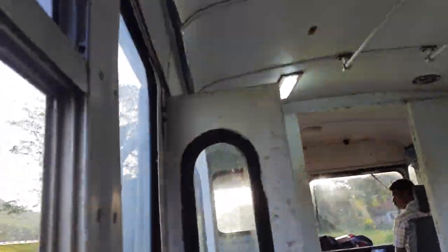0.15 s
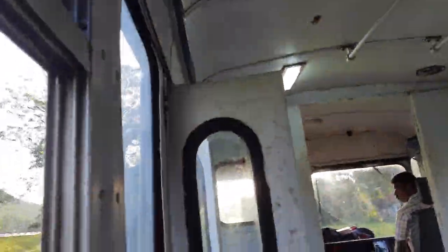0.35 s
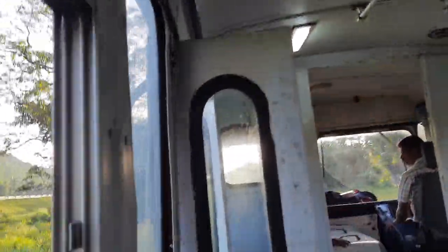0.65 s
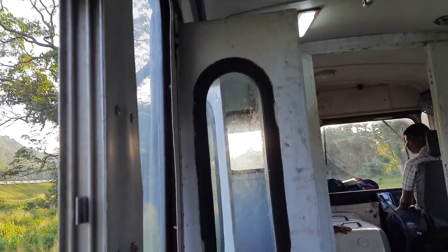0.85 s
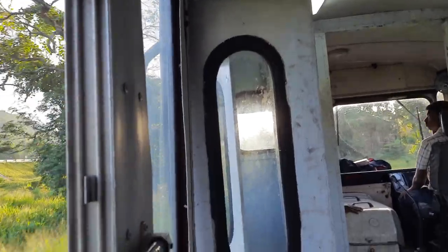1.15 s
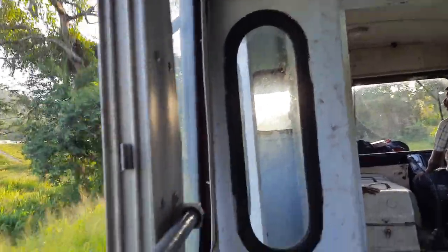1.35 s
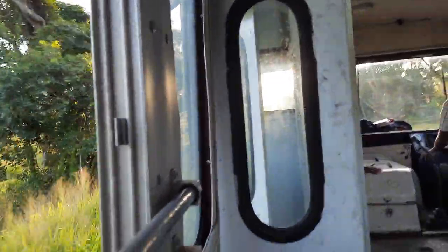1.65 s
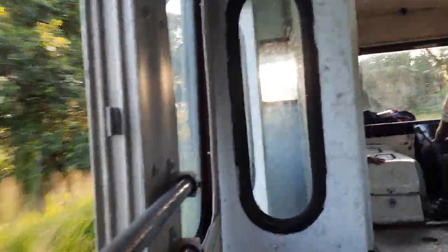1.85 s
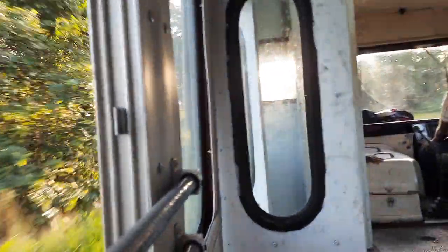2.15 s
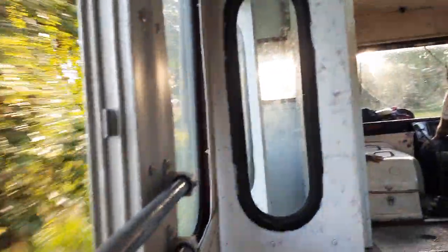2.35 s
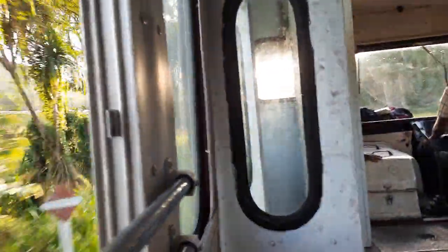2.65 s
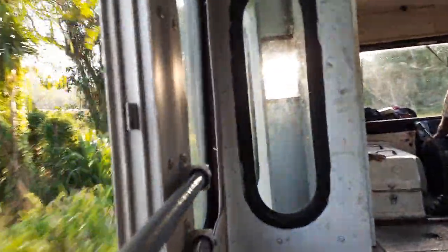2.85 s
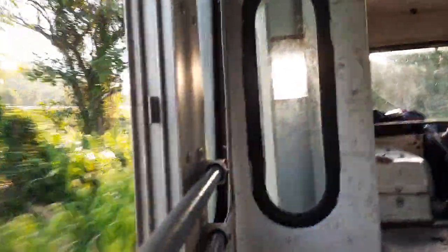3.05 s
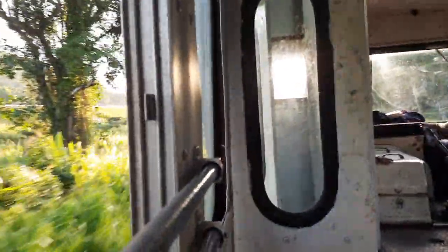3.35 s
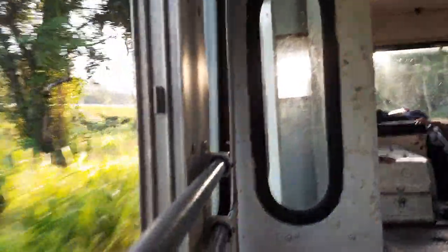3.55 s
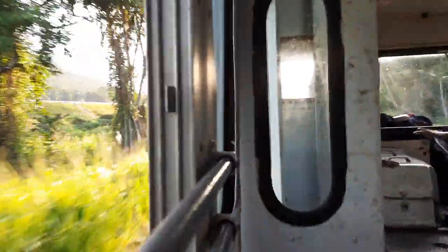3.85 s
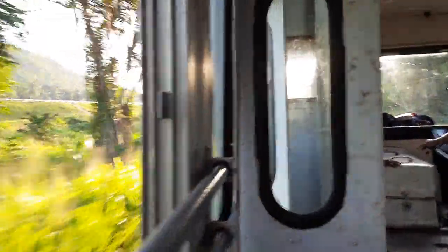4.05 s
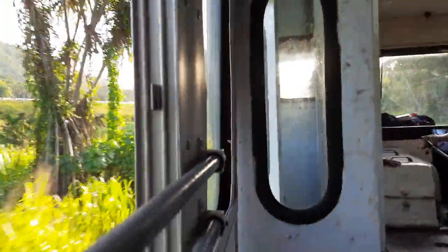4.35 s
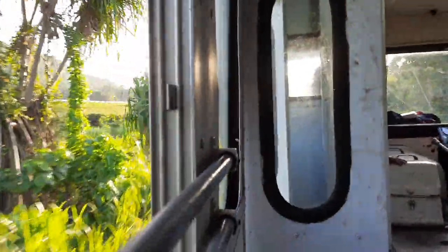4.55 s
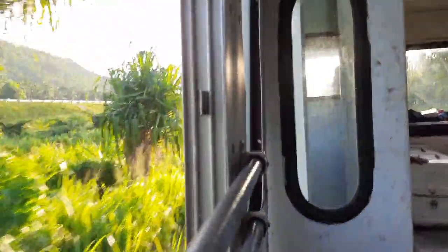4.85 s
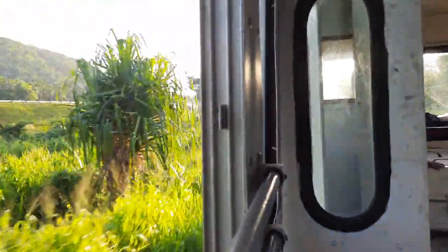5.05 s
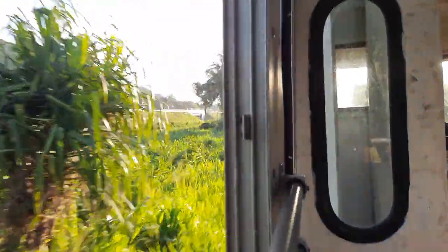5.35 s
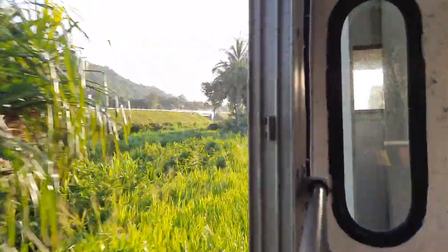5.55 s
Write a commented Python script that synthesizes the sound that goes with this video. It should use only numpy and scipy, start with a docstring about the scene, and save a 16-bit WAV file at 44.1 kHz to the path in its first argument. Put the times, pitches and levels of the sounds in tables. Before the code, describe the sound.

Low drumming of a moving rail carriage with soft rushing air, and ragged wind gusts crackling mainly against the left side of the microphone.

```python
"""The deep boom and rumble of a rail bus in open country, heard by a two-port microphone at its open door.
The body is filtered noise that surges over uneven track; air past the doorway is swelling, flickering noise.
Gusts are short bursts of fluttering noise, mostly on the left port, and pressure pops crackle, most within
gusts and some alone; the left port's bass drops out for a moment at set times."""
import sys
import numpy as np
from scipy import signal
from scipy.fft import rfft, irfft, next_fast_len
from scipy.io import wavfile
from scipy.ndimage import uniform_filter1d

SR = 44100
rng = np.random.default_rng(int(sys.argv[2]) if len(sys.argv) > 2 else 0)


def put_to_file(sound):
    """Save the sound as 16-bit audio at rate SR, in the file named by the first command-line argument."""
    columns = np.atleast_2d(sound).T  # one column per channel
    safe = np.clip(columns, -1, 1)
    whole_steps = np.round(safe * 32767)
    wavfile.write(sys.argv[1], SR, whole_steps.astype(np.int16))


N = 251354
T = np.arange(N) / SR
COARSE = T[::16]  # slow controls need fewer points in time
FAST = next_fast_len(N)  # a length that transforms quickly

# The drumming body between surges.
# Each row: time in seconds, level in dB, lift of the deepest boom in dB (surges included).
BODY_BED = [(0, -14.5, -3.5), (.4, -17.5, -2), (.8, -19, -4), (1.4, -23.5, 5), (2, -17, -3.5),
            (2.9, -22, 0.5), (3.6, -18, -0.5), (4.25, -23.5, 3), (4.9, -19.5, 4), (5.7, -23.5, 5)]


def gain_of(db):
    """Turns decibels into a factor."""
    return 10 ** (np.asarray(db) / 20)


def evened(x):
    """Scales x to an rms (average strength) of 1."""
    return x / np.sqrt(np.mean(x ** 2) + 1e-20)


def read(points, hz):
    """Reads a table over frequency, joining its points on a log axis."""
    f, value = np.transpose(points)
    return np.interp(np.log(hz + 1), np.log(f + 1), value)


def curve(rows):
    """Draws each column of a table over time out to every sample."""
    s, *columns = np.transpose(rows)
    return [np.interp(T, s, c) for c in columns]


def fine(rows):
    """Draws coarse controls out to every sample."""
    return np.array([np.interp(T, COARSE, row) for row in rows])


def coloured(x, spectrum, band, sudden=False):
    """Filters x so that white noise of rms 1 has rms 1 inside the band (Hz); sudden keeps attacks sharp."""
    hz = np.fft.rfftfreq(FAST, 1 / SR)
    gain = gain_of(read(spectrum, hz))
    inside = (hz > band[0]) & (hz < band[1])
    gain = gain / np.sqrt(np.mean(inside * gain ** 2))
    if sudden:  # minimum phase: nothing sounds before the blow
        echo = irfft(np.log(gain), FAST)
        gain = np.exp(rfft(echo * (1 + np.sign(np.fft.fftfreq(FAST)))))
    return irfft(rfft(x, FAST) * gain, FAST)[..., :N]


def bass_of(x, edge_hz):
    """Keeps the part of x below the edge, with a smooth slope."""
    hz = np.fft.rfftfreq(FAST, 1 / SR)
    return irfft(rfft(x, FAST) / (1 + (hz / edge_hz) ** 6), FAST)[..., :N]


def flicker(ms, channels):
    """Makes smooth chance movement of rms 1 that changes within about ms milliseconds."""
    size = max(round(ms * SR / 1000), 1)
    smooth = uniform_filter1d(rng.standard_normal((channels, N)), size)
    return evened(uniform_filter1d(smooth, size))


def patchy(x, patch_db, size=512):
    """Lifts and lowers small patches of time and pitch by chance, alike on both ports."""
    overlap = size * 3 // 4
    z = signal.stft(x, nperseg=size, noverlap=overlap)[2]
    field = rng.standard_normal(z.shape[1:])
    for _ in range(2):
        field = uniform_filter1d(field, size=3, axis=0)
        field = uniform_filter1d(field, size=5, axis=1)
    patches = evened(gain_of(patch_db * evened(field)))
    return signal.istft(z * patches, nperseg=size, noverlap=overlap)[1][:, :N]


def body_levels():
    """Gives boom and rumble gains: a lumpy bed, with surges over uneven track that swell and fall away."""
    # Each row: start in seconds, length in seconds, boom level in dB, upper rumble against the boom in dB.
    # The soft edges keep very short surges below their level.
    surge_rows = [(0.002, 0.46, -18, -6), (0.391, 0.023, -31, -10), (0.426, 0.16, -13, -15),
                  (0.667, 0.049, -12, -4), (0.72, 0.072, -14.5, -5), (0.804, 0.071, -21.5, 3.5),
                  (0.886, 0.08, -27, 9), (0.981, 0.037, -19, 3.5), (1.02, 0.067, -20.5, -3.5),
                  (1.136, 0.022, -11, -6.5), (1.182, 0.043, -23, 4.5), (1.245, 0.086, -17.5, -5.5),
                  (1.337, 0.093, -20.5, 2), (1.466, 0.2, -19.5, 0), (1.792, 0.027, -6.5, -17),
                  (1.897, 0.028, -14.5, -5.5), (1.96, 0.093, -11, -8.5), (2.139, 0.033, -18.5, 7),
                  (2.197, 0.2, -15.5, -10.5), (2.586, 0.06, -14, -9.5), (2.73, 0.081, -14.5, -5.5),
                  (2.856, 0.027, -16.5, -3.5), (3.13, 0.021, -19, -25), (3.475, 0.044, -16, -7),
                  (3.54, 0.05, -19, -8), (3.687, 0.015, -9, -27), (3.848, 0.097, -12.5, -2.5),
                  (4.191, 0.11, -16.5, -3.5), (4.367, 0.058, -16.5, -0.5), (4.485, 0.03, -14.5, -1.5),
                  (4.755, 0.068, -11, -6.5), (5.094, 0.013, -11.5, -7.5), (5.133, 0.027, -13.5, -4.5),
                  (5.247, 0.031, -12.5, -3.5), (5.327, 0.022, -9.5, -8.5), (5.478, 0.021, -9.5, -9),
                  (5.539, 0.025, -13.5, -18), (5.627, 0.054, -20.5, 3.5)]
    edge_s, bed_rumble_db, lumps_db = 0.017, -4, 2
    bed_db = curve(BODY_BED)[0] + lumps_db * flicker(31, channels=2)
    surges = 0
    for s, length, db, rumble_db in surge_rows:
        before = s + edge_s - COARSE
        after = COARSE - s - length + edge_s
        away = np.maximum(np.maximum(before, after), 0)
        power = gain_of([[db], [db + rumble_db]]) ** 2
        surges = surges + power * np.exp(-(away / edge_s) ** 2)
    bed = gain_of(bed_db + [[0], [bed_rumble_db]])
    return np.sqrt(bed ** 2 + fine(surges))


def body():
    """Panels boom and rumble in swells; the ports are most alike from about 60 to 290 Hz."""
    # Tone of the deep boom. Each row: frequency in Hz, strength in dB per Hz.
    boom = [(15, -38), (35, -2), (55, 0.5), (68, 1.5), (88, 11.5), (104, 10.5), (120, 11.5), (135, 8.5),
            (148, 13), (185, 1), (230, -34), (400, -110)]
    # Tone of the upper rumble. Each row: frequency in Hz, strength in dB per Hz.
    rumble = [(60, -89), (120, -21.5), (175, -2.5), (210, 1.5), (248, 1.5), (330, -8), (450, -15.5),
              (700, -23.5), (1100, -37.5), (3000, -100)]
    # How alike the ports are, less so in the deepest bass.
    # Each row: frequency in Hz, left-right likeness from 0 to 1.
    likeness = [(25, 0.32), (60, 0.92), (130, 0.92), (290, 0.82), (640, 0.51), (1200, 0.71), (3000, 0.08)]
    # Loudness balance of the ports. Each row: frequency in Hz, left over right in dB.
    left_lean = [(100, 0.1), (200, 1), (330, 3), (600, 1.5)]
    deep_hz = 113
    hz = np.fft.rfftfreq(FAST, 1 / SR)
    same = np.clip(read(likeness, hz), 0, 1)
    lean = gain_of(read(left_lean, hz) * [[.5], [-.5]])
    out = np.zeros((2, N))
    layers = zip(body_levels(), (boom, rumble), ((60, 170), (170, 400)), (70, 50))
    for level, spectrum, band, steady_ms in layers:
        shared, *own = rfft(rng.standard_normal((3, FAST)))
        mixed = np.sqrt(same) * shared + np.sqrt(1 - same) * np.array(own)
        pair = coloured(irfft(lean * mixed, FAST), spectrum, band)
        size = round(steady_ms * SR / 2000)
        power = uniform_filter1d(uniform_filter1d((pair ** 2).mean(0), size), size)
        steadied = evened(pair / (abs(power) + 0.074) ** 0.047)  # slightly evens the noise's slower swells
        out += steadied * uniform_filter1d(level, size=300)
    return out + (gain_of(curve(BODY_BED)[1]) - 1) * bass_of(out, deep_hz)


def air(gust):
    """Separate noise at each port under a common swell that gusts lift, with shared flicker and own eddies."""
    # Each row: time in seconds, rush level in dB, fine hiss against the rush in dB.
    air_rows = [(0, -41, -20), (.08, -41.5, -11), (.16, -39.5, -12.5), (.41, -42.5, -19), (.47, -39.5, -11),
                (.57, -39.5, -13), (.63, -45.5, -19), (.82, -41.5, -16), (1.03, -43.5, -16),
                (1.08, -40.5, -13), (1.34, -40, -15), (1.44, -42.5, -16), (1.56, -42, -13),
                (1.84, -48, -19), (1.95, -42, -20), (2.12, -47, -16), (2.22, -40, -18), (2.36, -47, -19),
                (2.47, -43.5, -13), (2.6, -48.5, -24), (2.75, -49.5, -17), (2.79, -45.5, -18),
                (2.95, -47.5, -13), (3.28, -49.5, -24), (3.33, -45, -16), (3.43, -50, -18),
                (3.52, -43.5, -14), (3.72, -45.5, -17), (3.78, -44.5, -18), (3.85, -41, -18),
                (3.94, -40.5, -17), (4.01, -48, -15), (4.27, -45.5, -19), (4.33, -45.5, -14),
                (4.44, -37.5, -17), (4.52, -43, -16), (4.73, -45, -14), (4.8, -41.5, -15.5),
                (5.08, -46.5, -18), (5.15, -43.5, -13), (5.22, -48, -11), (5.28, -43.5, -15),
                (5.56, -42.5, -21), (5.62, -50.5, -20), (5.7, -41.5, -25)]
    # Tone of the rush. Each row: frequency in Hz, strength in dB per Hz.
    rush = [(100, -65), (250, 5), (500, 15.5), (1000, 12.5), (1800, 5.5), (2600, 4), (4500, 0.5),
            (6650, -4), (8200, -6.5), (9300, -28), (11000, -64), (14000, -72)]
    # Tone of the fine hiss. Each row: frequency in Hz, strength in dB per Hz.
    fine_hiss = [(4000, -70), (7000, -25), (9300, -3), (10500, -3), (12500, 0), (14000, -3), (15800, -4)]
    stir_db, stir_ms = .25, 70.
    gust_rush_db, steady_hiss_db = -33, -66  # rush added by gusts; hiss that never stops
    rush_db, hiss_db = curve(air_rows)
    passing = gain_of(rush_db + stir_db * flicker(stir_ms, channels=1))
    swell = np.hypot(passing, gain_of(gust_rush_db) * gust)
    hiss = np.hypot(swell * gain_of(hiss_db), gain_of(steady_hiss_db))
    shared_db = 0.79 * flicker(19, channels=1)
    eddies_db = 0.27 * flicker(4.1, channels=2)
    stir = evened(gain_of(shared_db + eddies_db))
    noise = stir * rng.standard_normal((2, N))
    return coloured(noise * swell, rush, (2500, 8000)) + coloured(noise * hiss, fine_hiss, (10000, 15500))


def gust_level():
    """Gains of flutter and thud at each port: gusts rise a little faster than they fall, over a breeze."""
    # Each row: peak time in seconds, port (0 left, 1 right), fall to a quarter of its height in ms,
    # flutter level in dB, lift of its low thud in dB.
    gust_rows = [(0.464, 0, 9.2, -28.5, -8), (0.517, 0, 27, -31.5, 1), (0.518, 1, 35, -35, 8.5),
                 (0.576, 0, 20, -29, -4), (0.617, 0, 13, -26, -3), (0.643, 0, 16, -24, -1),
                 (0.668, 0, 27, -26, 2), (0.697, 1, 19, -29, 1), (0.697, 0, 37, -24.5, 3),
                 (1.006, 0, 14, -31, 4), (1.081, 0, 12, -31, -4), (1.114, 0, 9.8, -34.5, 14),
                 (1.153, 0, 57, -33, -9), (1.338, 0, 53, -31.5, -4), (1.625, 0, 140, -33.5, -5),
                 (1.71, 0, 26, -36, 2), (2.17, 0, 23, -26.5, -3.5), (2.204, 0, 21, -25, -4),
                 (2.279, 0, 23, -31.5, -8), (2.33, 0, 27, -34, -11), (2.372, 0, 40, -31, 0),
                 (2.435, 0, 8.5, -36, 0), (2.494, 0, 8.7, -40, 10), (2.536, 0, 8.1, -42, 13),
                 (3.383, 0, 77, -38.5, -6), (3.661, 0, 5.5, -30, 0), (3.709, 0, 27, -30, 0.5),
                 (3.75, 0, 60, -37, -5), (3.813, 0, 5.9, -31, 7), (3.859, 0, 60, -27, -13),
                 (3.939, 0, 71, -33.5, -0.5), (4.072, 0, 55, -32.5, -6), (4.104, 0, 19, -31, 0),
                 (4.279, 0, 71, -31.5, -6), (4.401, 0, 38, -39, -7), (4.645, 0, 20, -32.5, 2.5),
                 (4.687, 0, 10, -28.5, -2), (4.799, 0, 41, -31, 3.5), (4.911, 0, 28, -28.5, -4),
                 (4.98, 0, 17, -25.5, 3), (5.011, 0, 32, -30, 5), (5.052, 0, 8.1, -30, -13),
                 (5.176, 0, 12, -31.5, 4), (5.363, 0, 29, -32, 5), (5.396, 0, 6.4, -29.5, 1),
                 (5.516, 0, 17, -23.5, -4.5), (5.562, 0, 50, -26, -6), (5.637, 1, 28, -33.5, 1)]
    other_port_db = -6.5  # what a gust leaves on the far port
    rise = 0.9  # a gust rises in this share of the time it takes to fall
    breeze_db, swing_db = -47.5, 5  # small gusts left to chance
    power = low = 0
    for s, port, ms, db, thud_db in gust_rows:
        share = gain_of(other_port_db * abs(np.array([[0], [1]]) - round(port)))
        width_s = ms / 1000 * np.where(COARSE < s, rise, 1)
        blow = (gain_of(db) * share) ** 2 * np.exp(-np.log(16) * ((COARSE - s) / width_s) ** 2)
        power = power + blow
        low = low + blow * gain_of(thud_db) ** 2
    breeze = gain_of(breeze_db + swing_db * flicker(42, channels=2)) ** 2
    return np.sqrt(fine(power) + breeze), np.sqrt(fine(low) + breeze)


def gusts(gust, thud):
    """Each gust flutters the port with ragged noise; some thud more than others."""
    # Tone of the flutter. Each row: frequency in Hz, strength in dB per Hz.
    flutter_tone = [(60, -52), (150, -21.5), (350, 8), (600, 0.5), (1000, -8), (1800, -18), (2500, -18.5),
                    (5000, -53), (8200, -44), (9500, -53), (15800, -51)]
    thud_hz, ragged_db, ragged_fine_db = 600, 2.7, 3.4
    rough_db = ragged_db * flicker(1.9, channels=2) + ragged_fine_db * flicker(0.46, channels=2)
    ragged = evened(gain_of(rough_db) * rng.standard_normal((2, N)))
    flutter = coloured(gust * ragged, flutter_tone, (600, 2500))
    return flutter + (thud / gust - 1) * bass_of(flutter, thud_hz)


def pops(gust):
    """Each pop is a dull pressure kick of either sign with a brief ragged wake, plus a brighter snap."""
    # Sharp pops, most within gusts and some alone. Each row: start in seconds, port (0 left, 1 right),
    # kick strength in dB before colouring, snap over the kick in dB.
    pop_rows = [(0.5153, 0, -27, -24), (0.5331, 0, -18.5, -23), (0.5582, 0, -22, -12),
                (0.5739, 0, -21.5, -12), (0.5895, 0, -25, -20), (0.6376, 0, -24, -14),
                (0.6439, 0, -19.5, -12.5), (0.664, 0, -31, -4), (0.674, 0, -27, -6), (0.6765, 0, -34, -6),
                (0.6865, 0, -19, -30), (0.693, 1, -16, -33), (0.6937, 0, -28, -28), (0.6985, 0, -16, -34),
                (0.7, 1, -16, -34), (0.706, 1, -20, -26), (0.718, 0, -26, -34), (1.0777, 0, -19, -15),
                (1.116, 0, -23, -25), (1.1535, 0, -28, -32), (1.6237, 0, -20, -31), (1.7106, 0, -23.5, -28),
                (1.817, 0, -26.5, -30), (2.076, 0, -27, -25), (2.101, 0, -28, -30), (2.1606, 0, -17.5, -15),
                (2.1668, 0, -25, -11), (2.176, 0, -27, -9), (2.1963, 0, -26, -26), (2.2043, 0, -20, -29),
                (2.2045, 1, -29, -22), (2.2116, 0, -28, -10), (2.2808, 0, -27.5, -6.5),
                (2.305, 0, -27, -19), (2.3657, 0, -35, -30), (2.375, 0, -31, -23), (2.3842, 0, -17.5, -36),
                (2.3968, 0, -33, -34), (2.3999, 1, -19, -28), (2.406, 0, -26, -31), (2.4347, 0, -28, -24),
                (2.637, 0, -31, -28), (3.57, 0, -37, -30), (3.707, 0, -21, -32), (3.8383, 0, -22, -24),
                (3.858, 0, -25, -11), (3.87, 0, -36, -14), (3.8846, 0, -22, -19), (3.9271, 0, -18, -28),
                (3.938, 0, -22, -31), (3.9555, 0, -20, -16), (4.103, 0, -30, -33), (4.2585, 0, -26, -30),
                (4.3171, 0, -30, -30), (4.6891, 0, -22.5, -26), (4.8949, 0, -26, -26),
                (4.9025, 0, -28, -10), (4.9123, 0, -24, -27), (4.9195, 0, -18, -37),
                (4.9234, 0, -26.5, -10), (4.9773, 0, -27, -11), (4.988, 0, -32, -8), (5.0035, 0, -25, -28),
                (5.0143, 0, -19, -24), (5.032, 0, -33, -36), (5.248, 0, -36, -30), (5.3964, 0, -24, -29),
                (5.5136, 0, -19, -28), (5.5205, 0, -25, -30), (5.5448, 0, -30, -3.5), (5.551, 0, -35, -18),
                (5.56, 0, -24, -11), (5.5736, 0, -30, -2), (5.5965, 1, -32, -27), (5.6359, 1, -22, -34)]
    # Tone of the dull kick. Each row: frequency in Hz, strength in dB per Hz.
    kick_tone = [(100, -26), (400, 1.5), (900, -1), (1800, -8.5), (3000, -19), (4500, -30), (8000, -52)]
    # Tone of the snap. Each row: frequency in Hz, strength in dB per Hz.
    snap_tone = [(1500, -20), (3500, 17), (6000, 1.5), (8200, -5.5), (9500, -21), (12500, -7), (15800, -11)]
    small_per_s, small_db, small_snap_db = 450., -7.5, -21.  # chance pops, scaled by the gust around them
    leak_db, leak_s = -11, .0002  # what a pop leaves on the far port, a moment later
    t = np.arange(70) / SR
    hits = rng.random((2, N)) < small_per_s / SR
    chance = hits * rng.standard_normal((2, N)) * gust * gain_of(small_db)
    kicks = chance * np.sqrt(len(t))
    snaps = kicks * gain_of(small_snap_db)
    wakes = rng.standard_normal((len(pop_rows), len(t)))
    for (s, port, db, snap_db), wake in zip(pop_rows, wakes):
        shape = 0.14 * wake * np.exp(-t / 0.0017)
        shape[0] = np.sign(wake[0])  # the kick itself
        at = round(s * SR)
        kicks[round(port), at:at + len(t)] += gain_of(db) * evened(shape)
        snaps[round(port), at:at + len(t)] += gain_of(db + snap_db) * evened(shape)
    near = coloured(kicks, kick_tone, (700, 4000), sudden=True)
    near = near + coloured(snaps, snap_tone, (4000, 15500), sudden=True)
    return near + gain_of(leak_db) * np.roll(near[::-1], round(leak_s * SR), axis=1)


def dropped(left):
    """Lowers only the bass of the left port during each dropout, with softened edges."""
    # Each row: start in seconds, length in ms, depth in dB.
    dropout_rows = [(0.624, 100, -11), (1.085, 59, -13), (1.7, 29, -30), (2.167, 52, -11), (2.354, 24, -31),
                    (3.719, 75, -47), (4.626, 42, -16), (4.685, 65, -15), (4.904, 121, -15),
                    (5.044, 45, -20), (5.433, 42, -15), (5.55, 83, -26)]
    dropout_hz = 318
    depth_db = sum(db * ((T > s) & (T < s + ms / 1000)) for s, ms, db in dropout_rows)
    kept = gain_of(uniform_filter1d(depth_db, 600))
    return left - (1 - kept) * bass_of(left, dropout_hz)


def scene():
    """Adds body, air, gusts and pops at both ports, then drops the bass on the left."""
    gust, thud = gust_level()
    both = patchy(body(), patch_db=1.57, size=2048)
    both = both + patchy(air(gust), patch_db=2.5)
    both = both + patchy(gusts(gust, thud), patch_db=1.45)
    left, right = both + pops(gust)
    return np.array([dropped(left), right])


def record(dry):
    """Softly squeezes the loudest peaks, then cuts everything above the top edge."""
    edge_hz = 15820
    squeezed = 1.6 * np.tanh(dry / 1.6)
    padded = np.pad(squeezed, ((0, 0), (255, 255)), "reflect", reflect_type="odd")
    lowpass = signal.firwin(511, edge_hz, window=("kaiser", 9), fs=SR)
    return signal.oaconvolve(padded, lowpass[None], "valid", axes=1)


dry = scene()
out = record(dry)
put_to_file(out)
```